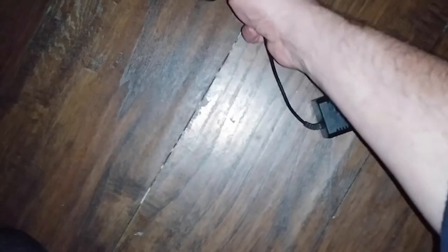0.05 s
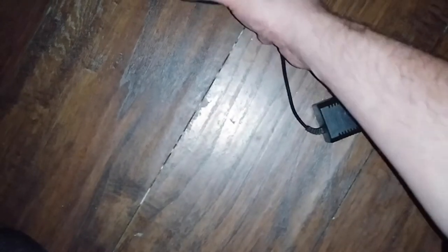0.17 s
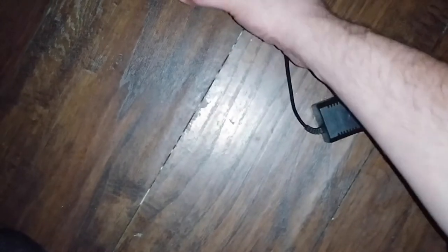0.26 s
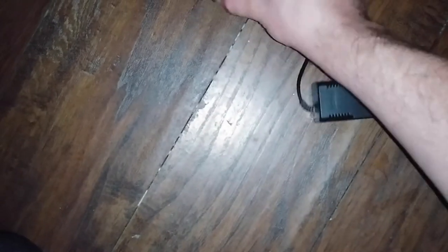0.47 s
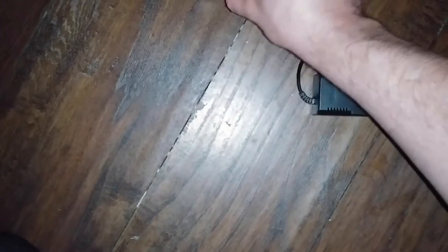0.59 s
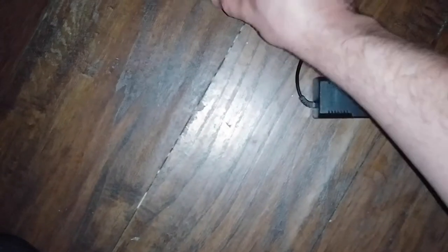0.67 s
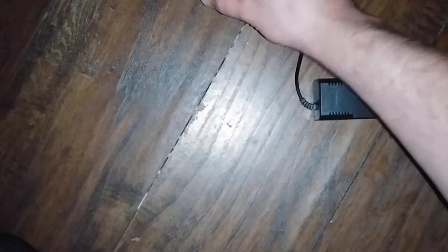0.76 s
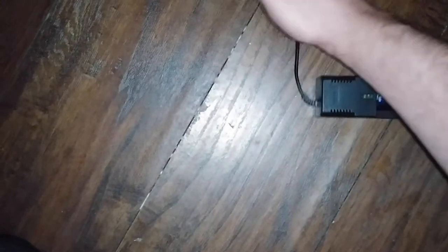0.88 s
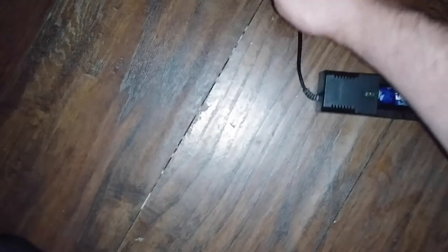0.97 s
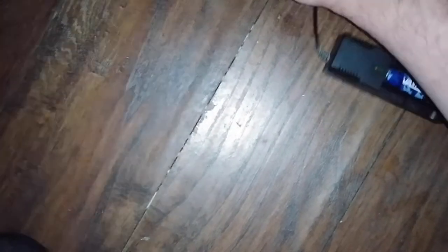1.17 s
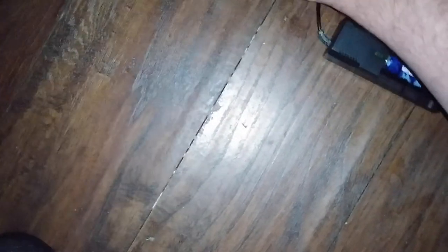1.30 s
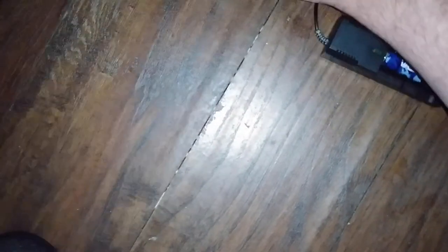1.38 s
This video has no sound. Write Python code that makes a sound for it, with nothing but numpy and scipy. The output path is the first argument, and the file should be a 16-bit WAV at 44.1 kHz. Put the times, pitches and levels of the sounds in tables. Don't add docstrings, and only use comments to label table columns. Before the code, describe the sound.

Close, dry indoor sound: a light plastic box sticks and slips across wood, with hollow judder, gritty scrape and two hard clacks; it drops to a gated hush, then soft bumps, a thin squeak and a snap.

```python
import sys
import numpy as np
from scipy import signal
from scipy.fft import rfft, irfft
from scipy.io import wavfile
from scipy.ndimage import uniform_filter1d

SR = 44100
rng = np.random.default_rng(int(sys.argv[2]) if len(sys.argv) > 2 else 0)


def to_linear_factor(level_db):
    exponent = np.asarray(level_db, float) / 20
    return 10 ** exponent


def pcm_store(signal):
    levels = np.round(np.clip(np.atleast_2d(signal), -1, 1) * 32767)
    wavfile.write(sys.argv[1], SR, levels.astype(np.int16).T)


N = 63945

# pitch_hz, level_db (per Hz)
CRACK_SPECTRUM = [(880, -19.5), (1500, 4), (2130, -12), (3030, -8), (5670, -15), (6960, -12), (9510, -24.5),
                  (15500, -65)]
RUB_PER_S, RUB_SPREAD_DB = 11000, 2.5


def evened(x):
    return x / np.sqrt(np.mean(x ** 2) + 1e-20)


def read(points, hz):
    f, value = np.transpose(points)
    return np.interp(np.log(hz + 1), np.log(f + 1), value)


def curve(table, column):
    points = np.array(table)
    return np.interp(np.arange(N) / SR, points[:, 0], points[:, column])


def colour(x, points):
    gain = to_linear_factor(read(points, np.fft.rfftfreq(len(x), 1 / SR)))
    return irfft(rfft(x) * gain, len(x))


def dull(x, top_hz):
    return signal.sosfilt(signal.butter(4, top_hz, fs=SR, output="sos"), x)


def smoothed_noise(noise, size):
    return evened(uniform_filter1d(uniform_filter1d(noise, size=size), size=size))


def ring(x, peaks):
    out = np.zeros(len(x))
    for hz, width, db in peaks:
        r = np.exp(-np.pi * abs(width) / SR)
        poles = [1, -2 * r * np.cos(2 * np.pi * hz / SR), r * r]
        out += to_linear_factor(db) * (1 - r) * signal.lfilter([1, 0, -1], poles, x)
    return evened(out)


def glide(x, peaks, factor):
    out = np.zeros(len(x))
    for hz, width, db in peaks:
        turn = np.exp(2j * np.pi * np.cumsum(hz * factor) / SR)
        r = np.exp(-np.pi * abs(width) / SR)
        out += to_linear_factor(db) * (turn * signal.lfilter([(1 - r) ** 2], [1, -2 * r, r * r], x / turn)).real
    return evened(out)


def slips(rate, spread_db):
    u = rng.random(N)
    e = rng.exponential(1, N)
    sign = rng.choice([-1., 1.], N)
    return sign * (u < rate / SR) * to_linear_factor(spread_db * np.minimum(e, 4))


def add(mix, s, sound):
    part = mix[max(round(s * SR), 0):][:len(sound)]
    part += sound[:len(part)]


def room_air():
    # pitch_hz, level_db (per Hz)
    air_spectrum = [(24, -45), (60, -14), (150, -1.5), (294, -5), (1220, -14.5), (5050, -21.5),
                    (7520, -15.5), (15500, -48)]
    return to_linear_factor(-67) * evened(colour(rng.standard_normal(N), air_spectrum))


def drag():
    # start_s, level_db, board_db, grit_db, hollow_pitch_factor
    pulls = [(0, -32, -9.5, -15.5, 1.02), (.045, -43, -7, -16, 0.94), (.14, -59, -5, -21, 1.04),
             (.152, -41.5, -6, -16.5, 0.92), (.245, -29.5, -10.5, -11.5, 1.05),
             (.325, -36, -7.5, -4.5, 1.04), (.363, -56, -1.5, -30.5, 1.3), (.375, -32, -3.5, -12, 1.2),
             (.47, -36.5, -15, -4, 1.11), (.497, -44.5, -23, -29, 1.25), (.545, -34.5, -4, -8, 1.05),
             (.59, -31.5, -16, -17, 1.01), (.735, -55.5, -8.5, -27.5, 0.965), (.8, -56, -2, -18, 1.04),
             (.98, -73.5, 0, -14.5, 0.97), (1.14, -59, 4, -3, 0.98), (1.28, -46, -5.5, -21.5, 0.98),
             (1.45, -46.5, 6, -11, 1.05)]
    # pitch_hz, width_hz, level_db
    hollow_modes = [(542.4, 58, 3), (600, 103, 6.5), (720, 167, 1), (838, 100, -9.5), (1088, 77, -14)]
    # pitch_hz, width_hz, level_db
    board_modes = [(212, 122, -9.5), (295.7, 47, 2), (340, 34, -13)]
    # pitch_hz, width_hz, level_db
    grit_modes = [(1690, 140, -5), (2000, 620, 10), (2480, 400, -12), (3240, 200, -5), (4420, 350, -17)]
    slips_per_s, spread_db, soft_hz, grit_top_hz = 1400, 2.5, 1228, 5000

    push = slips(slips_per_s, spread_db)
    hollow = glide(np.gradient(dull(push, soft_hz)), hollow_modes, curve(pulls, column=4))
    board_push = dull(slips(slips_per_s, spread_db), soft_hz / 2)
    low = to_linear_factor(curve(pulls, column=2)) * ring(board_push, board_modes)
    grains = .15 * push + slips(RUB_PER_S, RUB_SPREAD_DB)
    grit = to_linear_factor(curve(pulls, column=3)) * ring(dull(grains, grit_top_hz), grit_modes)
    return to_linear_factor(curve(pulls, column=1) - 6) * (hollow + low + grit)


def rub():
    # start_s, level_db, sheen_db
    strokes = [(0, -58.5, -12), (.05, -87, -30), (.1, -67.5, -10.5), (.12, -66.5, -4), (.15, -67, -18),
               (.3, -53, -36), (.335, -62.5, -21), (.38, -58, -35), (.5, -48.5, -15), (.545, -47, -15),
               (.63, -61, -14), (.84, -74, -19.5), (.92, -71.5, -23), (1.06, -94, -24.5),
               (1.14, -62.5, -30), (1.24, -59.5, -18), (1.29, -67, -17), (1.38, -59, -22)]
    # pitch_hz, level_db (per Hz)
    rustle_spectrum = [(710, -31.5), (1200, 0.5), (2120, -6), (3500, -7.5), (5430, -10), (7570, -3.5),
                       (9000, -14), (11500, -35.5)]
    # pitch_hz, level_db (per Hz)
    sheen_spectrum = [(7000, -29.5), (9500, 0.5), (15500, -12.5)]
    flicker_db = 3 * smoothed_noise(rng.standard_normal(N), size=250)
    rustle = evened(colour(slips(RUB_PER_S, RUB_SPREAD_DB), rustle_spectrum))
    sheen = evened(colour(rng.standard_normal(N), sheen_spectrum))
    tone = rustle + to_linear_factor(curve(strokes, column=2)) * sheen
    return to_linear_factor(curve(strokes, column=1) + 2.0 + flicker_db) * tone


def judders():
    # start_s, peak_db, pitch_hz, length_s
    shakes = [(.002, -30.5, 600, 0.01), (0.019, -37.5, 655, 0.022), (0.034, -34.5, 572, 0.012),
              (0.049, -43.5, 600, 0.015), (0.065, -45, 593, 0.0058), (0.091, -46.5, 710, 0.0076),
              (0.104, -52, 620, 0.0033), (0.15, -34, 597, 0.0082), (0.193, -31, 600, 0.013),
              (0.202, -37, 552, 0.023), (0.23, -25, 630, 0.0061), (0.237, -28.5, 720, 0.012),
              (0.252, -29, 804, 0.0066), (.258, -29, 775, 0.0076), (0.284, -36, 573, 0.014),
              (0.3, -31, 654, 0.0059), (0.315, -30, 658, .009), (0.387, -24, 600, .008),
              (0.396, -31.5, 647, 0.0053), (.406, -27, 599, 0.0094), (0.424, -28, 593, 0.0056),
              (0.427, -32, 453, 0.0056), (.437, -29.5, 654, 0.0052), (0.456, -26.5, 640, 0.0075),
              (0.461, -31, 564, 0.0086), (0.474, -43, 630, 0.0098), (0.512, -35, 620, 0.007),
              (0.532, -30.5, 900, 0.0039), (0.572, -25.5, 655, 0.011), (.583, -24.5, 735, 0.0036),
              (0.588, -31, 524, 0.0057), (0.593, -37, 600, 0.0076), (.606, -46, 390, 0.0048),
              (.627, -37, 600, 0.012), (.741, -56, 572, 0.0097), (.765, -48.5, 575, .016),
              (.341, -49, 630, .007), (1.009, -54.5, 298, 0.0099), (1.064, -67, 378, 0.013),
              (1.1, -47, 463, 0.0077), (1.141, -46.5, 304, .02), (1.229, -50, 360, .012),
              (1.245, -42.5, 335, 0.0089), (1.259, -46, 340, 0.026), (1.377, -44.5, 463, 0.017),
              (1.416, -37, 720, 0.0018), (1.424, -36.5, 600, 0.0088), (1.432, -47, 647, .006),
              (1.444, -47, 600, 0.0056), (.556, -20.5, 927, 0.011)]
    top_share, wobble = .4, .05
    out, t = np.zeros(N), np.arange(2500) / SR
    chance = rng.standard_normal((len(shakes), 2))
    for (s, db, hz, length), (bend, start) in zip(shakes, chance):
        u = t / (top_share * max(length, .002))
        turns = np.cumsum(hz * (1 + wobble * bend * np.tanh(u - 1))) / SR
        swell = (u * np.exp(1 - u)) ** 2
        add(out, s, to_linear_factor(db) * swell * np.sin(2 * np.pi * turns + 2 * start))
    return out


def ticks():
    # start_s, peak_db, pitch_hz, ring_s (t60)
    snaps = [(.0573, -54, 7440, 0.018), (0.0742, -45, 7300, 0.015), (0.2517, -43, 7850, 0.038),
             (0.489, -44.5, 7700, 0.045), (0.553, -28.5, 8030, 0.046), (0.617, -37, 6930, 0.022),
             (0.654, -44.5, 8100, 0.015), (0.7183, -47, 7413, 0.046), (0.8208, -57, 6700, 0.025),
             (.8905, -66, 7240, 0.019), (1.002, -64, 9020, 0.014), (1.119, -54, 1800, 0.017),
             (1.128, -57, 4450, 0.022), (1.4238, -33, 8150, 0.025), (1.4237, -34.5, 3600, 0.036),
             (1.4239, -31.5, 5000, 0.01), (1.4236, -38.5, 6600, .015), (1.424, -36.5, 1650, .015)]
    out, t = np.zeros(N), np.arange(3000) / SR
    noise = rng.standard_normal((len(snaps), 3000))
    for (s, db, hz, t60), z in zip(snaps, noise):
        peak = [(hz, 1100, 0)]
        tone = ring(ring(z, peak), peak) + 0.25 * evened(colour(z, CRACK_SPECTRUM))
        rise = np.minimum(t / 0.00055, 1)
        add(out, s, to_linear_factor(db - 2.5 - 60 * t / max(t60, .003)) * rise * tone)
    return out


def knocks():
    # start_s, peak_db, hollow_pitch_hz, thud_db, crack_db
    blows = [(0.1642, -25, 640, -18, -24), (0.219, -20.5, 720, -12, -56), (0.266, -27, 600, -27, -36),
             (0.3647, -6, 596, -16, -7.5), (0.5015, -18.5, 628, -3, -19), (0.5551, -11, 891, -17.5, -15),
             (0.5587, -11.5, 600, 4, -12.5), (.5619, -8.5, 600, -30, -9), (0.5649, -16.5, 600, 5.5, -8),
             (0.5674, -8.5, 607, -8.5, -16.5), (0.618, -25, 703, 6.5, -14.5), (0.761, -39, 480, 1, -17.5),
             (0.906, -52.5, 780, -6, -10.5), (1.0923, -42, 500, -1, -22.5), (1.127, -41, 488, 6, -29),
             (1.217, -39.5, 720, -16, -22), (1.222, -37, 710, -16, -20), (1.308, -35, 670, -26, -21.5),
             (1.323, -39, 670, -19, -18), (1.329, -38, 725, -27, -9), (1.357, -33.5, 860, -11, -33),
             (1.4106, -29, 650, -12, -21)]
    # pitch_multiple, level_db, ring_s (t60)
    shell_modes = [(1.0, 3, 0.018), (1.38, -5.5, 0.013), (1.9, -17, 0.036), (2.6, -12.5, 0.023),
                   (3.7, -18.5, 0.018), (5.2, -23.5, 0.025)]
    thud_hz, thud_t60_s, crack_t60_s, knock_db = 340, 0.011, 0.03, -3.5
    hard_db = -12
    blow_s, softer_s_per_db = 0.00024, .000035
    contact_db, contact_s = 6, .00008

    out, t = np.zeros(N), np.arange(4000) / SR
    noise = rng.standard_normal((len(blows), 4000))
    for (s, db, hz, thud_db, crack_db), z in zip(blows, noise):
        body = to_linear_factor(thud_db - 60 * t / thud_t60_s) * np.sin(2 * np.pi * thud_hz * t)
        for k, mode_db, t60 in shell_modes:
            soft_db = 0.087 * (k - 1.0) * min(crack_db - hard_db, 0)
            body += to_linear_factor(mode_db + soft_db - 60 * t / t60) * np.sin(2 * np.pi * k * hz * t)
        u = t[:200] / (blow_s + softer_s_per_db * max(hard_db - crack_db, 0))
        blow = np.sin(np.pi * np.minimum(u, 1)) ** 2
        body = np.convolve(body, blow / blow.sum())[:4000]
        rise = np.minimum(t / 0.00006, 1)
        crack = to_linear_factor(crack_db - 60 * t / crack_t60_s) * evened(colour(z, CRACK_SPECTRUM)) * rise
        tip = to_linear_factor(crack_db + contact_db) * np.exp(-((t - 3 * contact_s) / contact_s) ** 2)
        add(out, s, to_linear_factor(db + knock_db) * (crack - tip - body))
    return out


def room(x):
    # pitch_hz, t60_s
    decay = [(150, 0.22), (500, 0.35), (1500, 0.26), (5000, 0.25), (12000, .15)]
    taps = np.zeros(SR // 2)
    slots = np.arange(200, SR // 2 - 20, 20)
    taps[slots + rng.integers(0, 20, len(slots))] = 1
    taps *= rng.choice([-1., 1.], len(taps))
    hz, t, z = signal.stft(taps, SR, nperseg=256)
    fall = to_linear_factor(-60 * t / read(decay, hz)[:, None])
    tail = signal.istft(z * fall, SR, nperseg=256)[1]
    return signal.fftconvolve(x, tail / np.linalg.norm(tail))[:N]


def squeak():
    # pitch_hz, width_hz, level_db
    lines = [(1800, 120, -2), (2310, 80, 0), (2900, 150, -4), (3220, 110, -1), (4400, 250, -2),
             (4950, 300, -4)]
    start_s, length_s, level_db, glide_share, patchy_db = 1.12, .135, -59, .05, 3
    u = (np.arange(N) / SR - start_s) / length_s
    swell = np.clip(u, 0, 1) ** 0.36 * np.clip((1 - u) / 0.087, 0, 1)
    out = np.zeros(N)
    for hz, width, db in lines:
        patch = smoothed_noise(rng.standard_normal(N), size=900)
        waver = smoothed_noise(rng.standard_normal(N), size=900)
        pitch = 1 + glide_share * (np.clip(u, 0, 1) - .5) + 0.016 * waver
        out += to_linear_factor(db + patchy_db * patch) * glide(rng.standard_normal(N), [(hz, width, 0)], pitch)
    return to_linear_factor(level_db) * swell * evened(out)


def scene():
    hits = knocks() + ticks()
    moving = drag() + rub() + judders() + hits + to_linear_factor(-12) * room(hits) + squeak()
    low_cut = signal.butter(4, 235, "high", fs=SR, output="sos")
    return (signal.sosfilt(low_cut, moving) + room_air())[None]


def roll_off(x):
    return signal.sosfilt(signal.butter(12, 15980, fs=SR, output="sos"), x)


def record(dry):
    # middle_s, half_length_s, gain_db
    gate_moves = [
        (0.327, 0.0046, 4),
        (0.86, 0.023, -15.5),
        (.94, 0.014, -8.5),
        (0.975, 0.013, -13),
        (0.999, 0.0087, -8),
        (1.06, 0.0065, -13.5),
    ]
    t = np.arange(N) / SR
    gate_db = sum(db * np.exp(-((t - s) / half) ** 4) for s, half, db in gate_moves)
    band_limit = signal.firwin(511, 15950, window=("kaiser", 9), fs=SR)
    mix = signal.oaconvolve(dry * to_linear_factor(gate_db), band_limit[None], "same")
    return roll_off(mix)


dry = scene()
out = record(dry)
pcm_store(out)
```